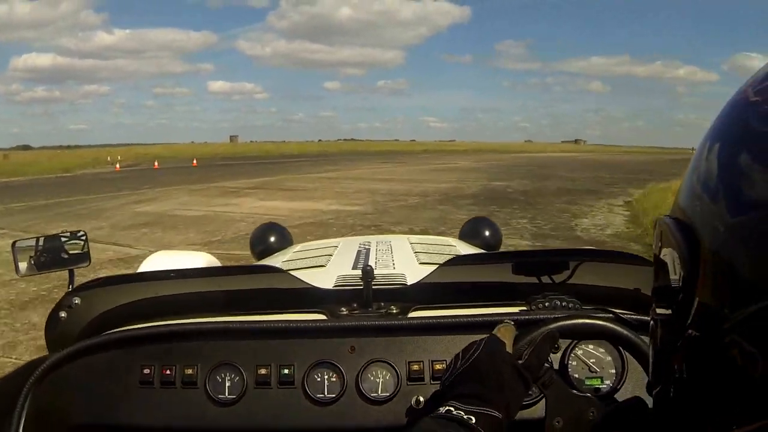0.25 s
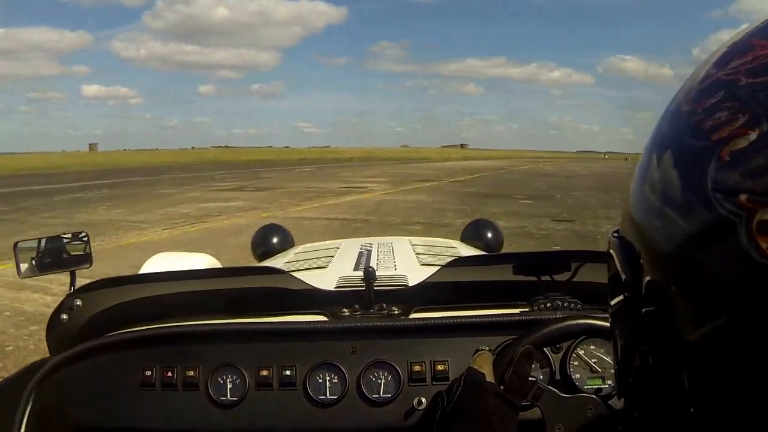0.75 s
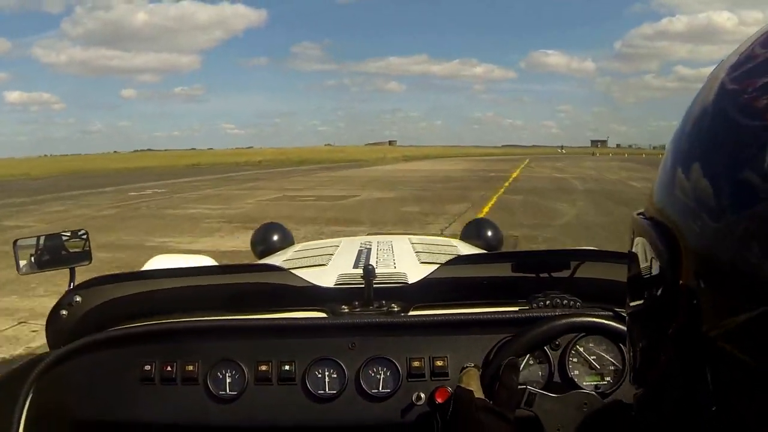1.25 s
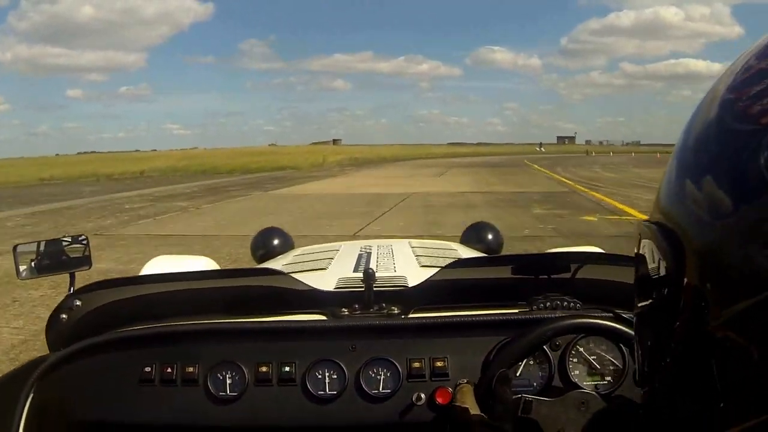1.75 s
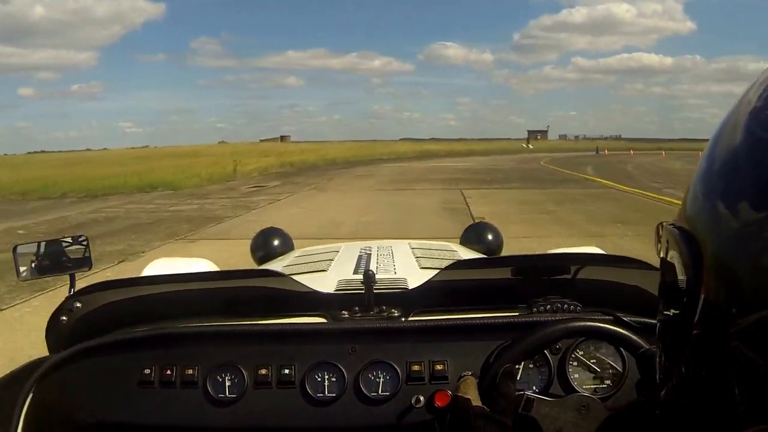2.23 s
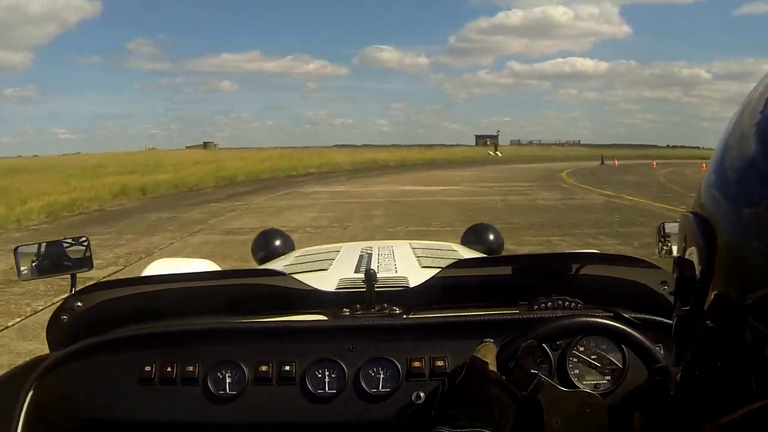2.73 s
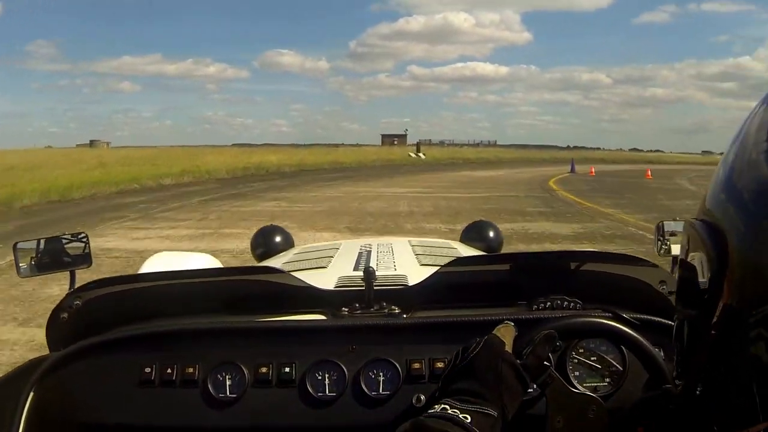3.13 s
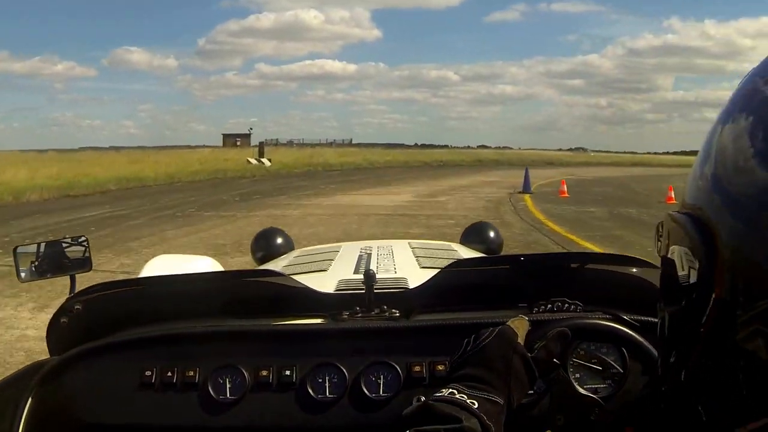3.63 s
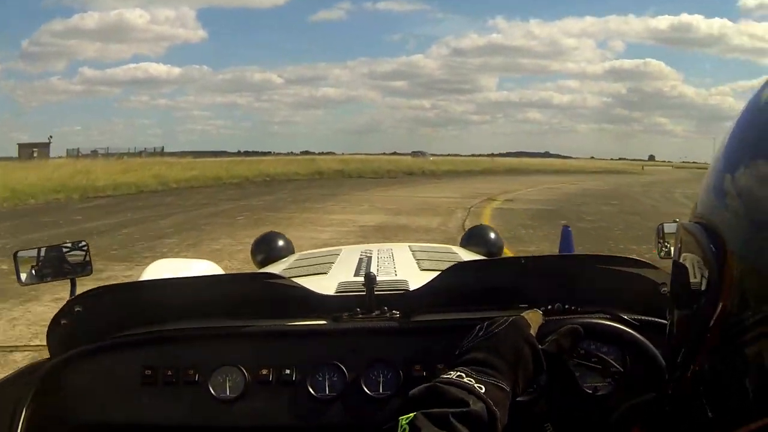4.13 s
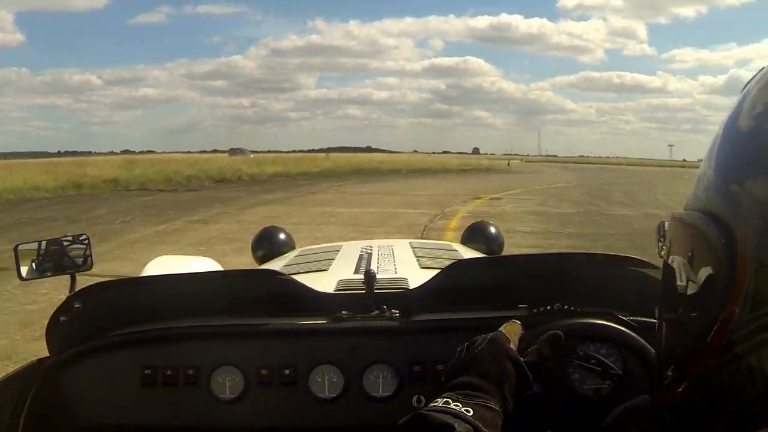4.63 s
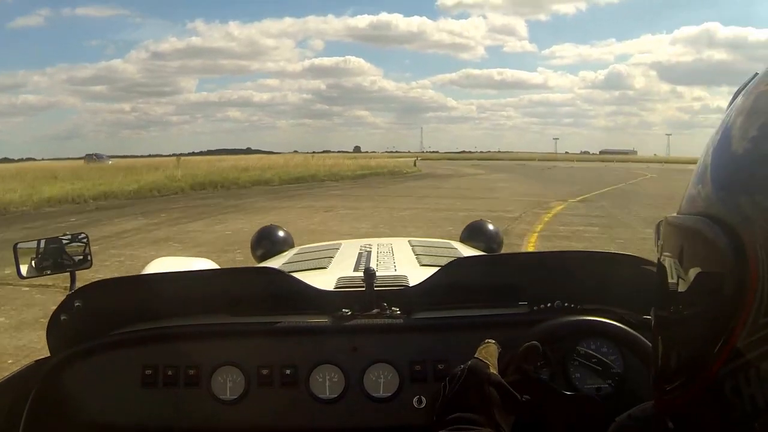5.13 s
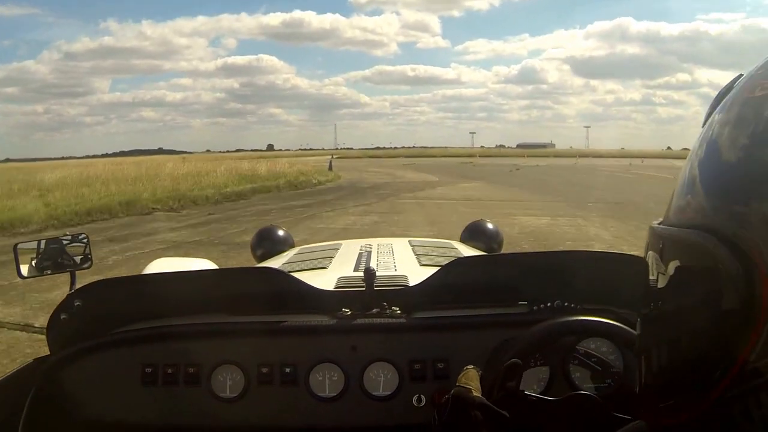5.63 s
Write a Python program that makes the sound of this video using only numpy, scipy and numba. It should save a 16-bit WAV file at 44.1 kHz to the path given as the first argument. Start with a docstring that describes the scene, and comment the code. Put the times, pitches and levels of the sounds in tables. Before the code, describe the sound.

Onboard a rotary-engined car, a muffled exhaust drone and gear whine swell, sag through a bend and climb again amid bassy buffeting.

```python
"""A rotary engine in an open car on a runway: exhaust partials and a gear whine locked to the shaft speed.
The microphone is that of a small camera in a sealed housing, close behind the dashboard.
A low shake sounds near 42 Hz; the camera knocks in the housing; the limiter's gain steps click.
Behind this lies wind and road roar: coloured noise, with thin rasps and broad hums where the housing rings.
A stepped limiter holds the peaks."""
import sys
import numpy as np
from scipy import signal
from scipy.fft import rfft, irfft, next_fast_len
from scipy.io import wavfile
from numba import njit

SR = 44100
rng = np.random.default_rng(int(sys.argv[2]) if len(sys.argv) > 2 else 0)


def waveform_to_disk(signal):
    """Save audio, clipped to [-1, 1], as 16-bit WAV at the path in sys.argv[1]."""
    frames = np.transpose(np.atleast_2d(signal))
    scaled = np.clip(frames, -1, 1) * 32767
    samples = np.round(scaled).astype(np.int16)
    wavfile.write(sys.argv[1], SR, samples)


def boost(x):
    """Linear amplitude factor 10**(x/20) for a level x in decibels (scalar or array-like)."""
    u = np.asarray(x, float) / 20
    return 10 ** u


N = 259308

# All levels below are those ahead of the gain and limiter in record().
# speed of the engine shaft: time_s, turns_per_s
SHAFT_SPEED = [(0.0, 40.2), (0.15, 39.6), (0.44, 40.3), (0.66, 39.75), (0.88, 40.4), (1.03, 41.1),
               (1.32, 41.75), (1.44, 42.55), (1.58, 42.4), (1.73, 44.6), (1.82, 41.4), (2.0, 40),
               (2.35, 36.5), (2.65, 34.3), (3.23, 31.7), (3.82, 30.1), (4.12, 30.06), (4.41, 30.9),
               (4.62, 31.15), (5.0, 32.55), (5.29, 34.0), (5.59, 35.95), (5.88, 37.25)]
# engine loudness: time_s, exhaust_db, gear_whine_db
ENGINE_LEVELS = [(0.0, -26.5, -53.5), (0.38, -30.5, -45), (0.56, -25, -29.5), (0.66, -18, -28.5),
                 (.73, -27, -42), (.84, -19, -31.5), (0.95, -22, -39), (.99, -18, -29.5),
                 (1.05, -18, -22.5), (1.12, -18.5, -30.5), (1.16, -19.5, -24.5), (1.25, -16.5, -17),
                 (1.31, -18.5, -25.5), (1.4, -19, -21.5), (1.5, -21.5, -27.5), (1.575, -23, -28),
                 (1.595, -18.5, -44), (1.61, -19.5, -27), (1.645, -23, -32), (1.67, -27, -48),
                 (1.76, -31, -61), (1.92, -24.5, -61), (2.2, -21.5, -56), (2.36, -20.5, -52),
                 (2.48, -48, -39.5), (2.85, -46.5, -45.5), (3.4, -48.5, -45.5), (3.8, -44.5, -47),
                 (4.22, -41.5, -50.5), (4.42, -21.5, -34), (4.56, -42, -28.5), (4.66, -39, -32),
                 (4.75, -40, -27.5), (4.85, -35, -26.5), (4.91, -41, -27), (4.97, -50, -20),
                 (5.04, -42, -21), (5.07, -43, -32), (5.1, -42.5, -23), (5.27, -28.5, -17.5),
                 (5.33, -27, -21.5), (5.38, -29, -20), (5.44, -26.5, -24), (5.55, -24, -21.5),
                 (5.7, -19.5, -20), (5.88, -24, -31)]
# engine partials that go their own way: time_s, then level_db of each of LONE_ORDERS
LONE_LEVELS = [(0, -41, -36, -54.5), (.44, -47.5, -41.5, -42), (.6, -19.5, -25, -53),
               (.88, -16, -29, -53.5), (1.05, -19.5, -26.5, -46.5), (1.3, -17.5, -21.5, -35.5),
               (1.5, -20, -29, -50), (1.75, -29, -57, -47), (1.92, -21.5, -36.5, -56),
               (2.2, -19.5, -38, -47), (2.4, -22, -34.5, -34), (2.65, -21.5, -36, -37),
               (2.9, -17.5, -38, -41), (3.15, -14.5, -41, -29), (3.45, -41, -52.5, -30.5),
               (3.7, -45, -48, -25.5), (4.15, -46.5, -46, -34.5), (4.28, -40.5, -34, -38.5),
               (4.55, -17.5, -29.5, -23), (4.72, -21, -36.5, -27), (4.86, -9, -32.5, -21),
               (5.0, -20.5, -41, -30), (5.2, -16, -29.5, -24), (5.45, -25, -30.5, -33.5),
               (5.7, -22.5, -27.5, -31), (5.88, -16.5, -28.5, -35)]
# their multiples of shaft speed
LONE_ORDERS = [1.5, 5, 6]
# fainter engine partials: time_s, then level_db of each of FAINT_ORDERS
FAINT_LEVELS = [(0.0, -29, -44.5, -46.5, -78), (0.21, -35.5, -40, -46, -61), (0.42, -31.5, -38, -35.5, -74),
                (0.63, -31, -28.5, -44, -56), (0.84, -36, -38, -44.5, -60.5),
                (1.05, -53.5, -52, -60, -40.5), (1.26, -43.5, -65, -39, -46),
                (1.47, -24.5, -44.5, -53, -48.5), (1.68, -56.5, -45.5, -59.5, -61),
                (1.89, -23.5, -37.5, -52.0, -41), (2.1, -40, -31.5, -36, -51),
                (2.31, -30, -25.5, -38, -39.5), (2.52, -37.5, -52, -61.5, -40.5),
                (2.73, -28, -44, -45, -38), (2.94, -25.5, -46, -57.5, -50.5), (3.15, -25, -51.5, -37, -45),
                (3.36, -30.5, -34, -28.5, -37), (3.57, -21.5, -41.5, -38, -30),
                (3.78, -33, -45.5, -32.5, -40), (3.99, -30, -54, -32, -33), (4.2, -45, -40.5, -44.5, -56.5),
                (4.41, -42.5, -28, -34, -45), (4.62, -32.5, -28, -25.5, -41.5),
                (4.83, -27.5, -32.5, -34.5, -45), (5.04, -29.5, -36.5, -35, -44),
                (5.25, -26.5, -34.5, -41, -45), (5.46, -30.5, -36, -62, -36.5),
                (5.67, -30.5, -33.5, -39, -38.5), (5.88, -35, -40.5, -36, -64)]
# their multiples of shaft speed
FAINT_ORDERS = [2, 3, 7, 8]
# low shake near 42 Hz; from 3.2 to 4.4 s mostly the engine's 1.5th order: time_s, pitch_hz, level_db
LOW_SHAKE = [(0.03, 43.7, -9.5), (0.08, 43.2, -13.5), (0.22, 42.02, -10), (0.45, 42.5, -6.5),
             (0.61, 42.5, -13.5), (0.64, 42.3, -7.5), (0.76, 42.4, -18.5), (0.97, 41.7, -16),
             (1.08, 40.65, -11.5), (2.12, 40.91, -12), (2.15, 41.1, -21), (2.22, 41.24, -17.5),
             (2.25, 42.34, -34), (2.36, 40.76, -2.5), (2.44, 41.36, -9), (2.7, 41.2, -8),
             (2.78, 41.45, -16.5), (2.86, 41, -11.5), (2.96, 41.43, -15), (3.0, 41.75, -17),
             (3.01, 42.11, -8.5), (3.04, 41.14, -11), (3.09, 41.7, -27), (3.11, 42.37, -15),
             (3.22, 44.96, -16), (3.38, 45.42, -12), (3.48, 44.34, -4.5), (3.66, 43.93, -12.5),
             (4.21, 43.66, -8.5), (4.28, 44.05, -16), (4.5, 43.24, -12.5), (4.68, 42.46, -12),
             (4.93, 41.74, -12.5), (4.96, 42.3, -24), (5.04, 41.33, -7.5), (5.09, 41.98, -19),
             (5.43, 42.02, -15.5), (5.46, 42.36, -46), (5.49, 43.26, -16), (5.85, 42.5, -15.5)]
# bumps in the runway: peak_s, upper_mode_db (sounds 5 dB lower), floor_panel_db (sounds 0.69 dB lower)
BUMPS = [(0.139, -21, -29), (0.512, -12, -38), (1.098, -12, -31), (1.95, -8, -41.5), (2.148, -21.5, -16.5),
         (2.23, -4, -25), (2.289, -12, -7.5), (2.619, -9.5, -9), (2.78, -18.5, -25.5), (3.12, -16, -21.5),
         (3.409, -9, -39), (3.757, -9.5, -38), (4.322, -19, -39), (4.439, -16.5, -15), (4.77, -11.5, -29),
         (4.989, -13, -16.5), (5.171, -24, -36)]
# slow levels at mean roar: time_s, upper_mode_db and floor_panel_db (both lowered as in BUMPS),
# boom_db, drone_db, buzz_db, hiss_db, sizzle_db
BAND_LEVELS = [(0, -17, -25.5, -34.5, -37.5, -38, -51, -68.5), (.7, -22, -27.5, -37, -39, -41, -51.5, -68),
               (1.3, -25, -36.5, -38, -38.5, -40.5, -51.5, -69.5),
               (1.8, -16.5, -26.5, -34.5, -41.5, -43, -52.5, -68.5),
               (2.3, -23.5, -26.5, -37.5, -35.5, -37.5, -48, -66.5),
               (2.8, -20.5, -27.5, -35, -39, -40, -51.5, -71),
               (3.3, -29.5, -22.5, -34.5, -38, -38, -48, -72),
               (3.9, -25.5, -28.5, -32.5, -35, -36.5, -50.5, -73.5),
               (4.4, -18.5, -28.5, -36, -38.5, -38.5, -53.5, -76),
               (4.9, -13, -28, -33.5, -36.5, -37, -50, -72.5),
               (5.02, -26.5, -24, -41, -36, -37, -51, -75.5),
               (5.25, -26.5, -35, -41, -38, -38, -50.5, -75.5), (5.88, -25, -30.5, -37, -37, -39, -52, -70)]
# the camera knocks in its housing: start_s, strength_db
KNOCKS = [(1.5131, -18), (1.5365, -19.5), (1.5848, -20), (1.6076, -19), (1.625, -29), (1.632, -31)]
# short modes of the knocked housing: pitch_hz, relative_db, t60_s
KNOCK_MODES = [(620, -2, .016), (850, -2, .012), (1150, -1, .012), (1420, 0, .011), (1680, -1, .012),
               (2300, -11, .008), (3000, -19, .009), (3500, -22, .008), (5100, -31, .006)]
# the sharpest limiter clicks: click_s, strength_db
SHARP_CLICKS = [(0.113, -43.5), (0.1456, -44.5), (0.1562, -46.5), (0.2768, -43), (0.2864, -49),
                (0.3212, -46.5), (0.4204, -41), (0.4384, -44), (0.4816, -51), (0.533, -38), (0.6378, -49.5),
                (0.6788, -34.5), (0.688, -48), (0.8438, -56), (0.854, -42.5), (1.1013, -41), (1.1703, -45),
                (1.177, -46.5), (1.2758, -40.5), (1.2996, -50), (1.4106, -45), (1.4442, -45),
                (1.4666, -39.5), (1.4907, -46), (1.5046, -47.5), (1.5126, -41), (1.5356, -48.5),
                (1.584, -48), (1.5878, -49), (1.6067, -50.5), (1.6235, -47), (1.6392, -52.5), (1.666, -51),
                (1.927, -40.5), (2.3472, -38.5), (2.384, -37), (2.5277, -41.5), (2.65, -42),
                (2.7867, -44.5), (2.8152, -39.5), (2.8222, -43.5), (2.8344, -48), (3.017, -40.5),
                (3.028, -47.5), (3.0383, -49.5), (3.1046, -43.5), (3.1128, -46), (3.1589, -44.5),
                (3.291, -47), (3.398, -43), (3.4617, -42.5), (3.481, -53), (3.4927, -44.5), (3.591, -48),
                (3.7498, -40.5), (3.798, -42.5), (3.9124, -48), (3.9622, -45), (3.982, -45), (4.077, -47),
                (4.0868, -41.5), (4.1659, -43.5), (4.2008, -46), (4.211, -47.5), (4.4148, -51.5),
                (4.5242, -42.5), (4.726, -44), (4.772, -49.5), (4.844, -42), (5.032, -38), (5.3044, -45),
                (5.409, -47), (5.748, -44.5)]
# housing rasp at mean roar: time_s, main_note_hz, main_note_db, then level_db of the first two RASP_NOTES
RASP_LEVELS = [(0, 2143, -39, -45.5, -70), (.1, 2184, -38.5, -48, -67), (.2, 2140, -36, -51, -66),
               (.26, 2135, -41, -53, -68), (.32, 2130, -53, -52, -67), (.37, 2160, -41, -46, -68),
               (.5, 2166, -43, -42, -70), (.55, 2140, -42, -46, -66), (.62, 2153, -33.5, -41, -56),
               (.77, 2136, -38, -35, -61), (.88, 2163, -42.5, -38.5, -58.5), (1.1, 2137, -41, -41, -52),
               (1.2, 2141, -42, -42.5, -63), (1.27, 2134, -36.5, -47, -53), (1.42, 2184, -45, -35, -60),
               (1.6, 2144, -42.5, -44, -69), (1.95, 2143, -52, -51, -71), (2.11, 2180, -42, -59.5, -70),
               (2.15, 2153, -35.5, -57, -71), (2.23, 2105, -34.5, -55, -72), (2.3, 2118, -38.5, -49, -76),
               (2.41, 2150, -50, -55, -61), (2.48, 2165, -32, -37, -65), (2.55, 2149, -46, -43, -63),
               (2.585, 2117, -34, -46, -65), (2.64, 2132, -38, -52, -67), (2.68, 2163, -47, -42.5, -67),
               (2.85, 2140, -44.5, -48.5, -64), (2.96, 2116, -41.5, -35, -65),
               (3.17, 2201, -42.5, -43.5, -70), (3.5, 2137, -36, -60, -64), (3.74, 2170, -35.5, -33, -70),
               (3.9, 2078, -37, -35.5, -50.5), (4.2, 2134, -39.5, -63, -58.5), (4.3, 2184, -35, -33, -58),
               (4.42, 2123, -31, -39.5, -52.5), (4.5, 2152, -35.5, -31.5, -56),
               (4.55, 2140, -26.5, -35, -57), (4.62, 2131, -30, -31.5, -50.5),
               (4.71, 2138, -29.5, -26, -50), (4.735, 2170, -39, -37.5, -52), (4.77, 2188, -42.5, -34, -58),
               (4.84, 2180, -31.5, -26, -49.5), (4.93, 2175, -47, -36, -53.5),
               (5.02, 2165, -45.5, -37, -56), (5.25, 2170, -61.5, -57, -52.5),
               (5.42, 2194, -40, -39.5, -61), (5.52, 2198, -33, -41, -52), (5.62, 2190, -40, -37, -52),
               (5.88, 2200, -40.5, -38.5, -59)]
# level at mean roar of the last two RASP_NOTES: time_s, third_note_db, fourth_note_db
THIN_NOTE_LEVELS = [(0, -63, -64), (.4, -69, -74), (.7, -63, -70), (1.5, -72.5, -79), (2.1, -57.5, -64),
                    (2.501, -60.5, -66), (2.8, -62.5, -67), (3.501, -62.5, -65.5), (4.1, -59, -69.5),
                    (4.5, -65, -68.5), (5.0, -69.5, -78), (5.4, -67.5, -72), (5.6, -64, -73),
                    (5.88, -68, -69.5)]
# rasp beside the main note: pitch_hz, width_hz, trim_db (added to the levels above)
RASP_NOTES = [(1985, 24, -3.5), (3255, 68, -2.5), (4460, 45, -1), (5330, 95, 2)]
# broad housing notes that swell and fade: time_s, then level_db of each of HUM_NOTES
HUM_LEVELS = [(0.04, -42, -33, -37), (0.14, -41, -36.5, -46), (0.24, -41, -38.5, -42),
              (0.34, -40, -48.5, -51), (0.44, -38, -41.5, -35), (0.539, -35.5, -32.5, -46),
              (0.64, -37, -27, -42), (0.74, -49, -38, -53), (0.841, -46, -32.5, -46),
              (0.94, -39, -40.5, -42), (1.04, -51, -34, -47), (1.14, -49.5, -41, -55),
              (1.24, -35.5, -39.5, -34), (1.34, -54, -51, -45), (1.441, -40.5, -41.0, -48),
              (1.54, -37, -43, -55.5), (1.62, -40.5, -36, -45), (1.67, -41, -43, -45),
              (1.74, -42.5, -44, -52.5), (1.84, -55, -52.5, -42), (1.94, -44, -47, -48),
              (2.04, -43.5, -33.5, -48), (2.14, -31, -35, -48), (2.24, -42, -38.5, -25.5),
              (2.34, -32, -31, -49), (2.44, -50, -45.5, -41), (2.54, -41, -43, -43), (2.64, -46, -41, -41),
              (2.74, -30, -30.5, -40.5), (2.84, -42.0, -41, -36.5), (2.94, -31, -34.5, -36.5),
              (3.04, -34, -36.5, -37), (3.14, -48, -38.5, -44.5), (3.24, -51.5, -35, -34),
              (3.341, -35.5, -36, -40.5), (3.44, -32.5, -30, -29), (3.54, -44, -36, -34.5),
              (3.64, -40, -39.5, -35.5), (3.74, -54.5, -45, -34), (3.84, -49, -42.5, -44),
              (3.94, -35.5, -37.5, -43.5), (4.04, -39.5, -47, -35.5), (4.14, -55.5, -38.5, -47.5),
              (4.239, -44, -58, -45.5), (4.34, -31, -29.5, -31), (4.44, -33, -40, -31.5),
              (4.54, -32.5, -26, -34), (4.64, -41, -38, -33.5), (4.74, -30.5, -47.5, -37.5),
              (4.84, -28.5, -33.5, -39), (4.94, -38, -31.5, -39), (5.041, -29.5, -38, -45),
              (5.141, -40.5, -42, -45), (5.239, -37, -39, -44.5), (5.34, -42.5, -38.5, -61.5),
              (5.439, -46.5, -37, -46), (5.539, -37, -35, -43.5), (5.64, -39.5, -33.5, -49),
              (5.74, -26, -29, -32.5), (5.841, -36.5, -38.5, -49)]
# their place: pitch_hz, width_hz
HUM_NOTES = [(562, 42), (682, 34), (905, 36)]
# (only the swing about the mean counts)
ROAR_LEVEL = [(0.03, -54), (.11, -48), (.14, -42.5), (.17, -58.5), (.22, -49), (.41, -46.5), (.5, -46.5),
              (.53, -51.5), (.58, -54), (.66, -46), (.69, -58.5), (.86, -48.5), (.88, -53), (1.08, -48.5),
              (1.45, -49.5), (1.49, -56), (1.76, -51.5), (1.88, -49), (2.06, -51), (2.28, -42),
              (2.35, -44.5), (2.41, -55), (2.62, -46.5), (2.68, -50), (2.82, -47.5), (2.85, -55),
              (3.01, -45), (3.06, -54), (3.11, -51.5), (3.19, -57), (3.48, -48), (3.52, -54.5), (3.76, -46),
              (3.79, -57.5), (3.99, -51), (4.02, -55), (4.08, -55), (4.23, -59.5), (4.39, -46), (4.57, -44),
              (4.62, -50), (4.7, -44.5), (4.93, -51.5), (4.97, -41.5), (5.04, -40.5), (5.055, -61.5),
              (5.09, -51), (5.18, -48), (5.23, -44), (5.295, -43.5), (5.32, -51), (5.38, -48), (5.43, -55),
              (5.51, -49.5), (5.74, -46), (5.85, -51.5)]
# broad colour of the roar, its shape within each layer: pitch_hz, density_db (per Hz)
ROAR_COLOUR = [(90, -43.5), (130, -41.5), (280, -52.5), (320, -66), (470, -64.5), (620, -56), (820, -65.5),
               (1000, -63), (1430, -68.5), (1600, -67.5), (2250, -69), (2450, -79.5), (3600, -86.5),
               (5100, -96.5), (5750, -101), (6500, -102), (8000, -107), (11700, -111), (12500, -120),
               (16000, -135)]
# housing resonances over that colour: pitch_hz, width_hz, relative_db
HOUSING = [(261, 108, 8), (1063, 9.4, 2), (1708, 29, 4.5), (1846, 20, 3), (2887, 44, -1), (3604, 110, 2),
           (3870, 70, 0), (4280, 71, 1), (4600, 90, 3), (4840, 150, -1), (5400, 110, 1.5),
           (6200, 120, -0.5), (1013, 40, -7.5), (2237, 60, -1)]
# layers of the roar (boom, drone, buzz, hiss, sizzle): from_hz, and level given between low_hz and high_hz
LAYERS = [(70, 230, 320), (330, 740, 1300), (1300, 1300, 1900), (2450, 2500, 4200), (6500, 7000, 12000)]
# share of the roar's swing in dB that each layer follows
LAYER_FOLLOWS = [.9, 0.77, 0.72, 0.72, 0.72]


def rms_one(x):
    """Scaled to unit power."""
    return x / np.sqrt(np.mean(x ** 2) + 1e-20)


def in_time(rows):
    """Each column of a table, drawn as straight lines sample by sample."""
    s, *columns = np.transpose(rows)
    return [np.interp(np.arange(N) / SR, s, c) for c in columns]


def at_hz(points, hz):
    """A spectrum read on a log-frequency axis."""
    point_hz, db = np.transpose(points)
    return np.interp(np.log(hz), np.log(point_hz), db)


def drift(rate_hz):
    """Slow chance with spread 1: noise through two equal low-passes, made at a twentieth of the rate."""
    r = np.exp(-40 * np.pi * rate_hz / SR)
    slow = signal.lfilter([1], [1, -2 * r, r * r], rng.standard_normal(N // 20 + 4002))[4000:]
    return np.interp(np.arange(N) / 20, np.arange(len(slow)), rms_one(slow - slow.mean()))


def band(x, low_hz, high_hz):
    """Butterworth band-pass."""
    return signal.sosfilt(signal.butter(2, [low_hz, high_hz], "band", fs=SR, output="sos"), x)


def tone(hz, waver_hz, waver_rate_hz, flutter_db):
    """A sine of rms near 1 whose pitch and level waver."""
    phase = 2 * np.pi * (np.cumsum(hz + waver_hz * drift(waver_rate_hz)) / SR + rng.random())
    return np.sqrt(2) * np.sin(phase) * boost(flutter_db * drift(waver_rate_hz))


def narrow_noise(hz, width_hz):
    """Noise of rms 1 in a thin band round a moving pitch, its swells partly evened out."""
    phase = 2 * np.pi * np.cumsum(hz + np.zeros(N)) / SR
    a, b = drift(width_hz), drift(width_hz)
    evening = (a * a + b * b + 0.1) ** 0.15
    return rms_one((a * np.cos(phase) + b * np.sin(phase)) / evening)


def bumps(column):
    """Gain that leaps up to each bump and dies after it."""
    rise_s, fall_s = 0.028, 0.021   # time to gain or lose 10 dB
    t, out = np.arange(N) / SR, np.zeros(N)
    for row in BUMPS:
        late = t - row[0]
        out += boost(row[column] - 10 * np.where(late < 0, -late / rise_s, late / fall_s))
    return out


def surge_db():
    """The roar's level about its mean."""
    level_db, = in_time(ROAR_LEVEL)
    return level_db - level_db.mean()


def exhaust(turns, exhaust_db):
    """Exhaust partials, all locked to one slightly uneven shaft."""
    angle = 2 * np.pi * np.cumsum(turns + 0.075 * drift(2.3)) / SR
    orders = LONE_ORDERS + FAINT_ORDERS + [4]   # the fourth order takes the exhaust level
    levels_db = in_time(LONE_LEVELS) + in_time(FAINT_LEVELS) + [exhaust_db]
    out = np.zeros(N)
    for order, db in zip(orders, levels_db):
        gain = np.sqrt(2) * boost(db + 0.81 * drift(7.1))
        out += gain * np.sin(order * angle + 2 * np.pi * rng.random())
    return out


def gear_whine(turns, whine_db, swing):
    """A tone at a fixed multiple of shaft speed with a rough edge, chopped by the low swing."""
    whine_hz = 16.45 * turns   # teeth per turn
    # a whine fainter than -27 dB is rougher
    rough_db = -13 + np.clip(-27 - whine_db, 0, 11)
    whine = tone(whine_hz, 1.5, 11, flutter_db=1.0) + boost(rough_db) * narrow_noise(whine_hz, 25)
    # rough overtones sound only while the third one crosses a housing resonance
    passed = 1 / (1 + ((3 * whine_hz - 1645) / 75) ** 4)
    overtones = boost(-17) * narrow_noise(3 * whine_hz, 24) + boost(-18) * narrow_noise(2 * whine_hz, 37)
    overtones = overtones * (1 + 0.55 * swing)
    return boost(whine_db) * (1 + 0.13 * swing) * (whine + passed * overtones)


def engine(swing):
    """Exhaust and gear whine driven by the same shaft speed."""
    turns, = in_time(SHAFT_SPEED)
    exhaust_db, whine_db = in_time(ENGINE_LEVELS)
    return exhaust(turns, exhaust_db) + gear_whine(turns, whine_db, swing)


def shake():
    """Two low modes of the mount, the upper one lifted by bumps; returns the bare swing and the sound."""
    pitch_hz, low_db = in_time(LOW_SHAKE)
    swing = tone(pitch_hz, 1.6, 5.93, flutter_db=1.5)
    low = boost(low_db) * (swing + boost(-13) * narrow_noise(50, 18))
    # the upper mode is uneven between bumps
    upper_gain = boost(in_time(BAND_LEVELS)[0] + 2.5 * drift(2.8)) + bumps(column=1)
    return swing, low + boost(-5) * upper_gain * narrow_noise(63, 5)


def knocks():
    """Each knock is a soft contact that rings the housing's short modes."""
    s, strength_db = np.transpose(KNOCKS)
    # each knock strikes the modes with other strengths
    spread_db = 2 * rng.standard_normal((len(s), len(KNOCK_MODES)))
    out = np.zeros(N)
    for k, (hz, db, t60_s) in enumerate(KNOCK_MODES):
        contacts = np.full(N, 1e-18)
        contacts[np.round(s * SR).astype(int)] = boost(strength_db + db + spread_db[:, k])
        contacts = np.convolve(contacts, np.hanning(8) / 3.5)[:N]   # each lasts a sixth of a millisecond
        r, w = boost(-60 / (t60_s * SR)), 2 * np.pi * hz / SR
        out += (-1) ** k * signal.lfilter([0, np.sin(w)], [1, -2 * r * np.cos(w), r * r], contacts)
    return out


def limiter_clicks(swing):
    """Puffs of bright noise that swell and are cut short; more clicks when the low shake is loud."""
    slope = np.diff(swing, prepend=0)
    turning = np.append(slope[1:] * slope[:-1] < 0, False)
    # a tenth of the swing ends click faintly at a shake of -10 dB
    chance = 0.1 * boost(2 * (in_time(LOW_SHAKE)[1] + 10))
    faint = boost(-60 + 3 * rng.standard_normal(N))
    marks = 1e-18 + turning * (rng.random(N) < chance) * faint
    for s, db in SHARP_CLICKS:
        marks[round(s * SR)] = boost(db)
    t = np.arange(round(0.008 * SR)) / SR
    shape = np.minimum(t / 0.003, 1) ** 3 * np.exp(-np.maximum(t - 0.003, 0) / 0.00015)
    white = rng.standard_normal(N)
    puffs = np.convolve(marks, shape)[round(0.0012 * SR):][:N] * white   # swelling starts before the mark
    bright = band(puffs, 2800, 6800) + boost(-12) * band(puffs, 6800, 11500)
    return bright / np.std(band(white, 2800, 6800))


def rasp(swing):
    """Housing rasp: thin bands of noise that ride on the roar and change with the low swing."""
    def gain(db):
        return boost(db + 0.62 * surge_db() + 2 * drift(4))

    main_hz, main_db, *levels_db = in_time(RASP_LEVELS)
    out = gain(main_db) * boost(drift(30)) * narrow_noise(main_hz, 32)   # 1 dB of fast flutter
    for (hz, width, trim_db), db in zip(RASP_NOTES, levels_db + in_time(THIN_NOTE_LEVELS)):
        wandering_hz = hz + 0.25 * width * drift(2.5)
        out += gain(db + trim_db + drift(12)) * narrow_noise(wandering_hz, width)
    return out * (1 + 0.062 * (swing ** 2 - 1) - 0.1 * swing)


def hum(swing):
    """Three broad notes of the housing, as noise bands chopped by the low swing."""
    bursts_db = drift(24)   # shared by the notes
    notes = np.zeros(N)
    for (hz, width), db in zip(HUM_NOTES, in_time(HUM_LEVELS)):
        gain = boost(db + 1.6 * drift(25) + bursts_db)
        notes += gain * narrow_noise(hz + 0.3 * width * drift(3.5), width)
    return notes * (1 + 0.19 * swing)


def floor_panel(panel_db):
    """A narrow low band of noise that lifts with the roar and leaps at bumps."""
    gain = boost(panel_db + 0.36 * surge_db() + 3 * drift(10)) + bumps(column=2)
    return boost(-0.69) * gain * narrow_noise(196, 14.8)


def roar(swing):
    """Noise coloured by bodywork and housing, cut in third octaves that flicker, gathered in layers."""
    size = next_fast_len(N)
    hz = np.maximum(np.arange(size // 2 + 1) * SR / size, 1)
    peaks = 0.5 + sum(boost(2 * db) / (1 + (2 * (hz - f) / width) ** 2) for f, width, db in HOUSING)
    noise = rfft(rng.standard_normal(size)) * boost(at_hz(ROAR_COLOUR, hz)) * np.sqrt(peaks)
    power = [np.sum(np.abs(noise[(hz > low) & (hz < high)]) ** 2) * 2 / size ** 2
             for _, low, high in LAYERS]

    _, panel_db, *bands_db = in_time(BAND_LEVELS)
    levels_db = [db + share * surge_db() for db, share in zip(bands_db, LAYER_FOLLOWS)]
    # the boom shares in the floor panel's leaps
    levels_db[0] = 20 * np.log10(boost(levels_db[0]) + boost(-27.5) * bumps(column=2))
    # loose parts buzz hardest at the negative end of each swing, most of all in the treble
    swing_end = swing ** 2 - 1 - 1.1 * swing
    buzz = [0.095, 0.046, 0.029, 0.075, 0.13]   # one for each layer

    out, together = floor_panel(panel_db), drift(43)
    place = 3 * np.log2(hz / 90)   # third octaves above 90 Hz
    for k in range(23):
        slot = np.cos(np.pi / 2 * np.clip(place - k, -1, 1)) ** 2
        part = irfft(noise * slot, size)[:N]
        layer = np.searchsorted(np.array(LAYERS)[:, 0], 90 * 2 ** (k / 3)) - 1
        flicker_db = 1.65 * together + 0.89 * drift(10) - 0.4
        gain = boost(levels_db[layer] + flicker_db) / np.sqrt(power[layer])
        out += part * gain * (1 + buzz[layer] * swing_end)
    return out


def scene():
    """The engine, the shake, the knocks and clicks, and the roar behind, on one microphone."""
    swing, shaken = shake()
    near = engine(swing) + shaken + knocks() + limiter_clicks(swing)
    behind = rasp(swing) + hum(swing) + roar(swing)
    return (near + behind)[None, :]


@njit
def peak_gain(x, ceiling, attack, release, block):
    """Limiter gain: drops when a block tops the ceiling and creeps back; it changes in steps."""
    gain, g = np.ones(len(x)), 1.0
    for i in range(0, len(x), block):
        peak = np.max(np.abs(x[i:i + block])) * g
        g = g * attack if peak > ceiling else min(1.0, g * release)
        gain[i:i + block] = g
    return gain


def low_pass(x):
    """Removes everything above the highest recorded frequency."""
    return signal.sosfilt(signal.butter(12, 15700, fs=SR, output="sos"), x)


def record(dry):
    """A bass cut, a stepped limiter whose small gain jumps crackle in the treble, and soft saturation."""
    step = 8   # samples
    bass_cut = signal.butter(2, 30, "high", fs=SR, output="sos")
    louder = signal.sosfilt(bass_cut, dry[0]) * boost(3.06)
    # falls 0.027 dB a step, recovers 12 dB a second
    gain = peak_gain(louder, 0.69, boost(-0.027), boost(12 * step / SR), step)
    held = 1.036 * np.tanh(louder * gain / 1.378)
    return low_pass(held[None, :])


dry = scene()
out = record(dry)
waveform_to_disk(out)
```